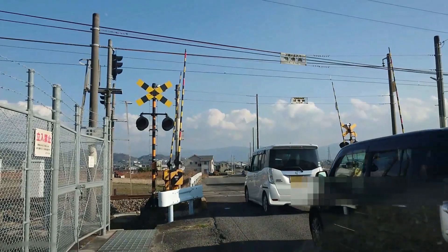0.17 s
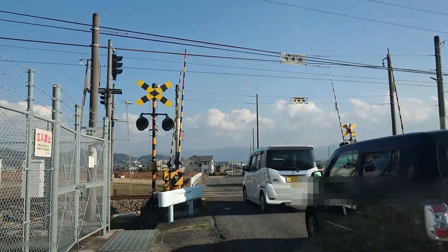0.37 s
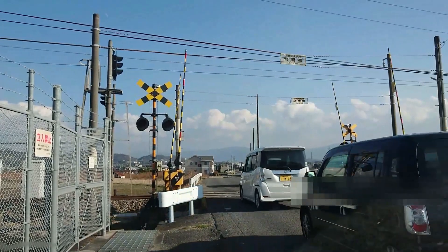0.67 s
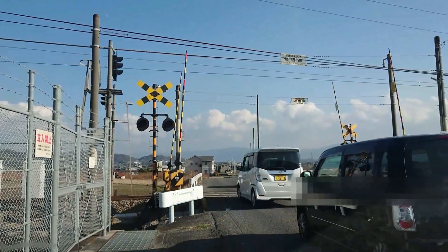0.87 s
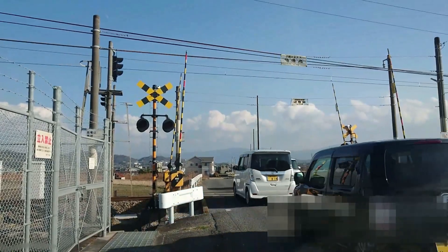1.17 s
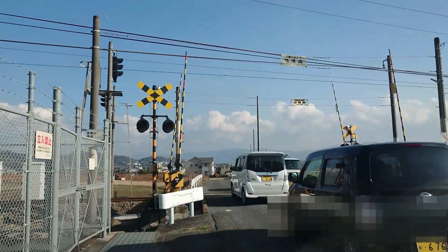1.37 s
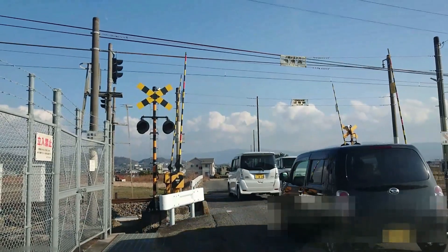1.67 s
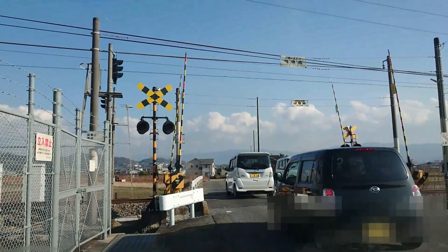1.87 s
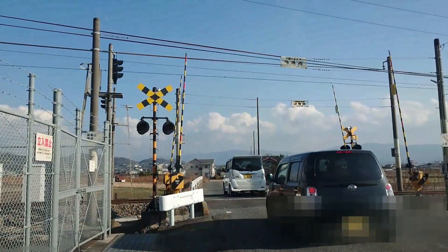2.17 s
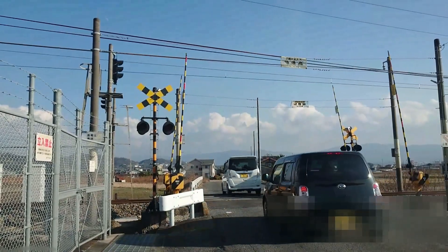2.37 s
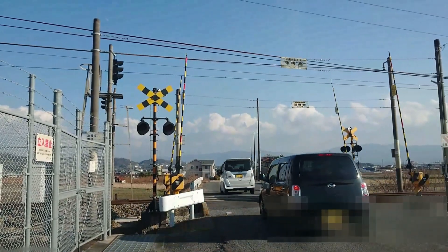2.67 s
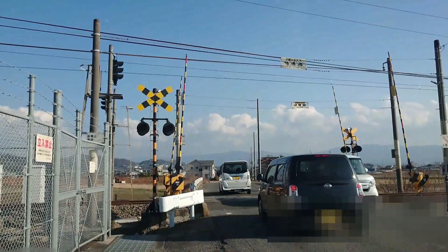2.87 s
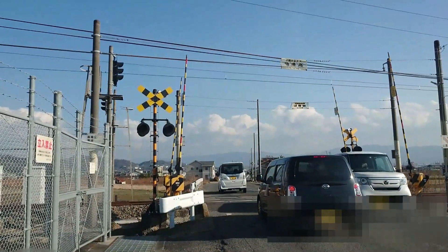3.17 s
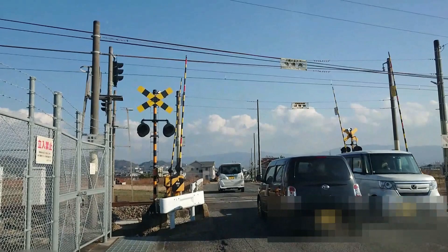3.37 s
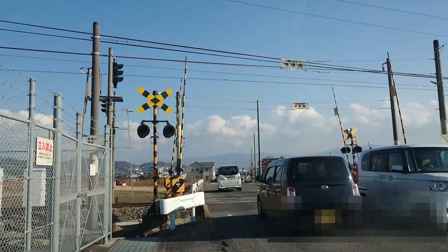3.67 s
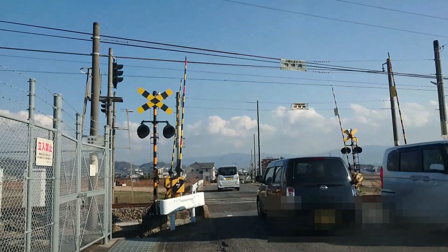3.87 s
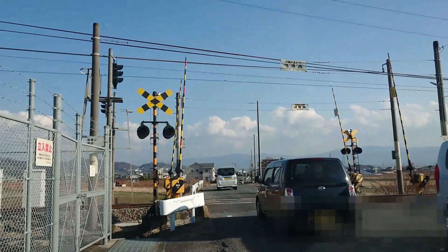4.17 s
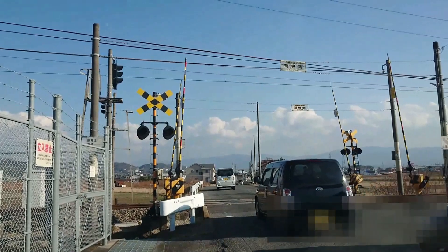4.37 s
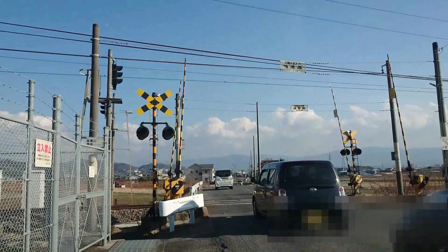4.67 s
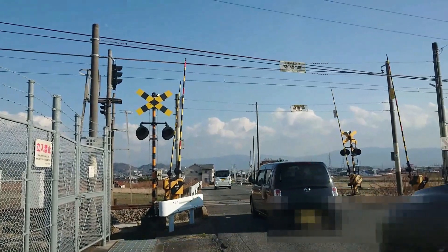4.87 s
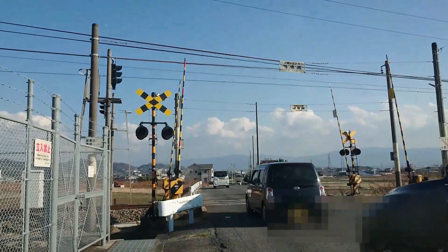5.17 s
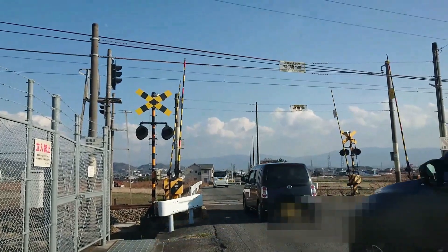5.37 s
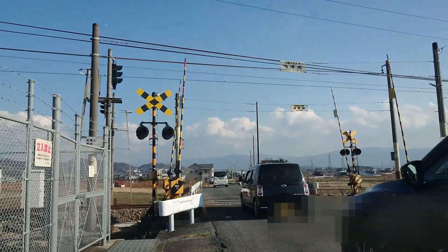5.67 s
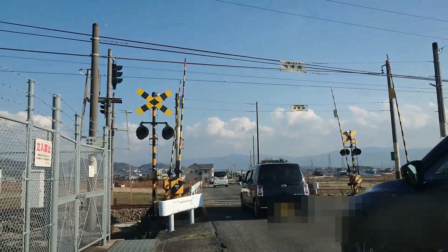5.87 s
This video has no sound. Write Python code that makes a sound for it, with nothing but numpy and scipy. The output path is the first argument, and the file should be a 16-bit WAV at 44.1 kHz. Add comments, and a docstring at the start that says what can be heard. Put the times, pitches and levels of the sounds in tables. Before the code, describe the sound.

Small cars idle and creep past close by, tyres thumping over a level crossing, with wind buffeting the microphone.

```python
"""Roadside at a level crossing: a phone's two microphones, an arm's length from a queue of three-cylinder cars.
Wind pops on the ports as the car alongside hisses and exhausts boom. About a second in a car pulls away
and a belt sings. Between two and three seconds tyres thump hardest over the rails; sand crunches under
the treads, with bright ticks here and there. Another engine climbs, more gusts hit, and just after five
seconds the next car draws alongside, its engine bay chattering, before the sound stops abruptly."""
import sys
import numpy as np
from scipy import signal
from scipy.fft import rfft, irfft, next_fast_len
from scipy.io import wavfile
from scipy.ndimage import uniform_filter1d

SR = 44100
rng = np.random.default_rng(int(sys.argv[2]) if len(sys.argv) > 2 else 0)


def dump_mix(stems):
    """Bounce the given channels to the path in sys.argv[1] as a 16-bit WAV at rate SR."""
    frames = np.atleast_2d(stems).T  # one column per channel
    limited = np.clip(frames, -1, 1)  # hard clip at full scale
    pcm = np.round(limited * 32767).astype(np.int16)
    wavfile.write(sys.argv[1], SR, pcm)


N = 265923
T = np.arange(N) / SR
ARRIVES_S, ARRIVE_TAKES_S = 5.146, 0.036  # the next car noses in beside the phone


def undb(db):
    """Decibels to gain."""
    return 10 ** (np.asarray(db) / 20)


def curves(table):
    """The columns of a table, joined by straight lines in time."""
    times, *columns = np.transpose(table)
    return [np.interp(T, times, column) for column in columns]


def unit(x):
    """Scale to rms 1."""
    return x / np.sqrt(np.mean(x ** 2))


def place(pan_db):
    """Microphone gains with a mean power of 1; pan_db is always left minus right."""
    gains = undb(np.array([[.5], [-.5]]) * pan_db)
    return gains / np.sqrt(np.mean(gains ** 2, axis=0))


def colour(x, points):
    """Filter by a (freq_hz, gain_db) outline that falls 90 dB an octave outside its ends; rms 1."""
    hz, db = np.transpose(points)
    size = next_fast_len(N)
    octave = np.log2(np.maximum(np.fft.rfftfreq(size, 1 / SR), 1))
    outside = np.abs(octave - np.clip(octave, np.log2(hz[0]), np.log2(hz[-1])))
    gain = undb(np.interp(octave, np.log2(hz), db) - 90 * outside)
    return unit(irfft(rfft(x, size) * gain, size)[..., :N])


def ring(x, hz, width_hz):
    """One resonance, gain 1 at its centre."""
    return signal.lfilter(*signal.iirpeak(min(hz, .45 * SR), hz / width_hz, fs=SR), x)


def walk(rate_hz):
    """Random drift: steps smoothed twice, spread near 1."""
    hold = int(SR / rate_hz)
    steps = np.repeat(rng.standard_normal(N // hold + 1), hold)
    return 1.3 * uniform_filter1d(uniform_filter1d(steps, hold), hold)[:N]


def cycles(hz, wobble, wobble_hz):
    """Running count of cycles at a pitch that wavers by the share `wobble`."""
    return np.cumsum(hz * (1 + wobble * walk(wobble_hz))) / SR


def air(likeness, lag_s=0.):
    """Noise at both microphones; the part they share reaches the left one lag_s later."""
    common, *own = rng.standard_normal((3, N))
    late = irfft(rfft(common) * np.exp(-2j * np.pi * np.fft.rfftfreq(N, 1 / SR) * lag_s), N)
    return np.sqrt(likeness) * np.array([late, common]) + np.sqrt(1 - likeness) * np.array(own)


def burst(peak_s, swell_s, decay_s):
    """An envelope that swells up to a moment and dies away."""
    return np.exp(np.maximum(np.minimum((T - peak_s) / swell_s, (peak_s - T) / decay_s), -30))


def handover(middle_s, takes_s):
    """Gain whose power rises smoothly from 0 to 1; a negative takes_s makes it fall."""
    return np.sqrt(.5 + .5 * np.tanh((T - middle_s) / (2 * takes_s)))


def passing(peak_s, half_width_s):
    """Gain of a car going by: a bell around its loudest moment."""
    return 1 / (1 + .5 * ((T - peak_s) / half_width_s) ** 2)


def during(table, fade_s=.05):
    """1 between the first and last moment of a curve, fading outside."""
    return np.clip(1 + np.minimum(T - table[0][0], table[-1][0] - T) / fade_s, 0, 1)


# Fans behind the queue: pitch_hz, level_db, pan_db
FAN_HUMS = [(131.3, -42, -5), (360.6, -55, 12), (593, -56.5, 11)]


def fans():
    """Fans hum in the background, easing by 5 dB between 2 and 4 s."""
    hum = 0
    for hz, db, pan_db in FAN_HUMS:
        tone = np.sqrt(2) * np.sin(2 * np.pi * cycles(hz, .002, 5.9))
        hum += tone * undb(db + walk(0.6)) * place(pan_db)
    return hum * undb(np.interp(T, [2, 4], [0, -5]))


# A drive belt, left of the phone: time_s, pitch_hz, level_db
BELT_SONG = [(1.18, 1100, -59), (1.27, 1105, -52), (1.37, 1120, -46), (1.47, 1158, -51), (1.54, 1110, -54),
             (1.61, 1097, -50), (1.72, 1090, -60)]


def belt(flutter_db=1.5):
    """A belt sings briefly and roughly as a car pulls away."""
    hz, db = curves(BELT_SONG)
    tone = np.sin(2 * np.pi * cycles(hz, .009, 200))
    return tone * undb(db + flutter_db * walk(62.7)) * during(BELT_SONG) * place(6.5)


# Sand on the road: centre_hz, relative_db
SAND_BANDS = [(1250, -3.5), (2200, -4), (4000, -8), (12000, -2)]


def sand(grains_per_s=900, queue_db=-59.5, next_car_db=-49.5, surge_db=2, patchy_db=4):
    """Treads crush sand: dense tiny cracks in uneven surges, loudest once the next car is alongside."""
    crunch = 0
    for hz, db in SAND_BANDS:
        cracks = (rng.random(N) < grains_per_s / SR) * rng.choice([-1, 1], N)
        cracks = cracks * undb(np.minimum(rng.exponential(size=N), 4))
        cracks = cracks * place(2 + 6 * rng.standard_normal(N))
        band = unit(ring(ring(cracks, hz, 0.81 * hz), hz, 0.81 * hz))
        crunch += band * undb(db + patchy_db * walk(35))
    gain = np.hypot(undb(queue_db), undb(next_car_db) * handover(ARRIVES_S, ARRIVE_TAKES_S))
    return crunch * gain * undb(surge_db * walk(24))


# Bright ticks and a swell of hiss at the phone: peak_s, level_db, centre_hz, decay_s, pan_db
TICKS_AND_HISS = [(0.1027, -28.5, 5000, 0.00053, 8), (1.226, -38, 14000, .003, 0),
                  (1.6629, -34, 4400, 0.0013, -3.5), (1.662, -39, 13500, 0.0019, -7),
                  (1.773, -26, 10000, 0.00069, 5), (1.8035, -36, 14500, 0.0014, -10),
                  (1.804, -42.5, 4600, .002, -3), (3.479, -41.5, 4560, 0.0081, -3),
                  (3.48, -44.5, 12970, 0.018, 3), (3.7878, -25.5, 2220, 0.0011, 5.5),
                  (3.79, -44, 13500, .05, 4), (3.7946, -27, 850, 0.0019, -8),
                  (3.811, -40, 12500, 0.002, 10), (3.811, -40.5, 3700, .002, -1),
                  (4.225, -36, 11000, 0.002, -2), (4.627, -39.5, 12000, 0.021, -2),
                  (4.627, -40.5, 4000, 0.022, -1.5), (4.6245, -33.5, 1900, 0.0044, -8),
                  (4.642, -46, 11500, .004, 3)]


def ticks(width_share=0.56, swell_share=0.4):
    """Short bright ticks, each in its own band, and one soft swell of high hiss near 3.8 s."""
    noise = colour(air(0.086), [(200, -9), (11000, -8.5), (14000, -7.5), (15800, -21.5)])
    bursts = 0
    for peak_s, db, hz, decay_s, pan_db in TICKS_AND_HISS:
        band = unit(ring(ring(noise, hz, width_share * hz), hz, width_share * hz))
        bursts += band * undb(db) * burst(peak_s, swell_share * decay_s, decay_s) * place(pan_db)
    return bursts


# Cars rolling past the phone: peak_s, half_width_s, tyre_relative_db, engine_rush_db, rush_pan_db
PASSING_CARS = [(1.28, 0.37, -44.5, -44.5, 2), (2.35, 0.25, -39.5, -70, -0.5), (4.1, 0.48, -46, -49, 0.5),
                (5.17, 0.17, -42, -38, 5.5)]
# Tread on asphalt, from the roadside: freq_hz, gain_db
TREAD_SPECTRUM = [(120, -30), (200, 0.5), (259, -11), (296, -8), (448, -16), (491, -13), (644, -25.5),
                  (1100, -40.5), (1430, -63), (2420, -120)]


def tyres(queue_db=-48.5, next_car_db=-37, boost_db=3.5):
    """Tread rumbles unevenly on worn asphalt, swelling with each car."""
    power = undb(queue_db) ** 2 + (undb(next_car_db) * handover(ARRIVES_S, ARRIVE_TAKES_S)) ** 2
    power += sum((undb(db) * passing(s, width)) ** 2 for s, width, db, _, _ in PASSING_CARS)
    return colour(air(0.83, 0.00039), TREAD_SPECTRUM) * np.sqrt(power) * undb(boost_db + walk(28))


# How the phone's two microphone ports differ: freq_hz, pan_db
PORT_TILT = [(60, 2.5), (110, 2), (200, -1), (380, 0), (700, 0.5), (1290, 3), (2380, 9.5), (4400, 2),
             (8120, -4), (15000, 3)]


def ports(x):
    """Each port favours its own bands; both sides come out at rms 1."""
    hz, pan_db = np.transpose(PORT_TILT)
    size = next_fast_len(N)
    gains = place(np.interp(np.fft.rfftfreq(size, 1 / SR), hz, pan_db))
    sides = irfft(rfft(x, size) * gains, size)[:, :N]
    return np.array([unit(side) for side in sides])


# Engine bays along the queue: freq_hz, gain_db
QUEUE_BAY_SPECTRUM = [(500, -8), (850, 4.5), (998, 3.5), (1130, 4), (1220, 2), (1320, 3.5), (1400, 1.5),
                      (2380, 3.5), (2790, -6), (4210, -6.5), (4900, -11), (5970, -11), (6640, -14),
                      (7200, -27), (9360, -52), (15800, -120)]
# The next car's bay, at arm's length: freq_hz, gain_db
NEAR_BAY_SPECTRUM = [(500, 1.5), (850, -10), (1070, -5.5), (1160, 3), (1230, -6.5), (1380, -0.5),
                     (1490, -7.5), (1750, 0), (1900, -12.5), (2550, -1.5), (2770, -10.5), (3280, -15.5),
                     (3620, -11.5), (5970, -18.5), (7200, -21.5), (9360, -35.5), (15800, -120)]


def bay_rush(firings, throb, leaving, arriving, queue_db=-46, leaving_db=-51.5, next_car_db=-34.5):
    """Engine bays rush and throb with the crank; the arriving one chatters with each firing."""
    power = (undb(queue_db) * place(5)) ** 2
    for peak_s, half_width_s, _, db, pan_db in PASSING_CARS:
        power = power + (undb(db) * passing(peak_s, half_width_s) * place(pan_db)) ** 2
    power += (undb(leaving_db) * leaving * place(14)) ** 2
    queue = np.sqrt(power) * ports(colour(air(0.17, 0.000343), QUEUE_BAY_SPECTRUM))
    near = undb(next_car_db) * arriving * place(5) * ports(colour(air(0.053, 0.00062), NEAR_BAY_SPECTRUM))
    chatter = 1 + 0.064 * np.cos(2 * np.pi * firings)
    return (queue * (1 + 0.11 * throb) + near * chatter) * undb(1.2 * walk(90))


# Fine hiss from the bays, left of the phone: freq_hz, gain_db
HISS_SPECTRUM = [(5000, -8), (8500, -5.5), (9530, 10), (10000, 13), (13300, 2), (15100, -6), (15800, -30)]


def bay_hiss(throb, leaving, arriving, queue_db=-52, leaving_db=-50.5, next_car_db=-44):
    """Hiss throbs with the crank in the queue and the leaving car; the next car's is even."""
    queue = undb(queue_db) * (1 + 0.89 * throb)
    staying = np.hypot(queue, undb(next_car_db) * arriving) * place(8)
    first_car = undb(leaving_db) * leaving * (1 + throb) * place(14)
    hiss = colour(air(0.23), HISS_SPECTRUM) * np.hypot(staying, first_car)
    return hiss * undb(walk(130) + .5 * walk(8.9))


def engine_bays(firings, crank_hz=21.65, throb_depth=0.23, leaves_s=1.46):
    """Rush and hiss share one crank throb as the first bay goes by and the next arrives."""
    crank = 2 * np.pi * cycles(crank_hz, .02, 1.6)
    throb = throb_depth * (np.cos(crank) + 0.38 * np.cos(2 * crank))
    leaving, arriving = handover(leaves_s, -0.042), handover(ARRIVES_S, ARRIVE_TAKES_S)
    return bay_rush(firings, throb, leaving, arriving) + bay_hiss(throb, leaving, arriving)


def overtone(firings, multiple, jitter_cycles=.01):
    """One multiple of a firing rate, roughened by firings that come a little early or late."""
    return np.sin(2 * np.pi * (multiple * (firings + jitter_cycles * walk(70)) + rng.random()))


# The next car's hum as it nears the phone: firing_multiple, relative_db
CREEP_OVERTONES = [(2, 1), (3, -8.5), (4, -13), (5, -26.5), (6, -11), (8, -22)]


def creeping_car(firing_hz=58, level_db=-29.5, swell_s=1.3):
    """An engine creeps up at a steady pitch; shielded at first, its upper overtones emerge last."""
    exposed = np.exp(np.minimum(T - ARRIVES_S, 0) / swell_s)
    firings = cycles(firing_hz, .008, 30)
    hum = sum(overtone(firings, k) * undb(db + 2 * walk(13)) * exposed ** k for k, db in CREEP_OVERTONES)
    return hum * undb(level_db)


# Engines leaving the crossing, one curve each: time_s, firing_hz, level_db, muffling_db_per_octave
PULL_AWAY_CURVES = [
    [(0.95, 43.9, -36, 6), (1.08, 45.16, -30, 5), (1.17, 46.66, -37.5, -1), (1.28, 50.07, -31.5, 4),
     (1.36, 55.94, -30, 6), (1.44, 59.5, -33.5, 0.5), (1.54, 59.98, -44, -6), (1.66, 52.7, -25, 6),
     (1.73, 49.76, -37.5, -8), (1.82, 47.4, -48, -2)],
    [(2.95, 58.1, -44, 14), (3.2, 57.53, -41.5, 11), (3.45, 58.45, -44.5, 10), (3.75, 58.56, -32, 12),
     (4.3, 57.55, -35, 10), (4.68, 60.15, -33, 4.5), (4.8, 61.1, -33.5, 7), (4.92, 64.06, -23.5, 15.5),
     (5.06, 66.9, -28, 10.5), (5.14, 68.2, -37, 17), (5.25, 64.5, -50.5, 13)],
]
# Resonances of the exhaust pipe: freq_hz, gain_db
PIPE_SPECTRUM = [(55, -4), (95, 3), (132, -14), (172, -3), (205, -1), (238, -10), (268, -17), (298, -12),
                 (350, -18), (430, -15), (520, -20), (700, -26), (900, -42)]


def pull_away(curve, muffle_from_hz=187, flutter_db=2.5):
    """Multiples of a gliding firing rate, each swelling as it crosses a pipe resonance."""
    hz, db, muffling = curves(curve)
    pipe_hz, pipe_db = np.transpose(PIPE_SPECTRUM)
    firings = cycles(hz, 0.0047, 30)
    drone = 0
    for k in range(1, 14):
        octaves_up = np.log2(np.maximum(k * hz / muffle_from_hz, 1))
        overtone_db = np.interp(k * hz, pipe_hz, pipe_db) - muffling * octaves_up
        drone += overtone(firings, k) * undb(overtone_db + flutter_db * walk(14))
    return drone * undb(db) * during(curve)


# Wind on the phone: peak_s, level_db, swell_s, decay_s, pan_db
WIND_BUFFETS = [(0.031, -8.5, 0.023, 0.073, 3.5), (.21, -21.5, .02, 0.039, -1),
                (0.31, -22, 0.044, 0.039, 8), (.43, -17.5, 0.05, 0.026, 30),
                (.59, -24.5, 0.082, 0.037, -10), (4.51, -13, 0.019, 0.012, 3.5),
                (4.61, -18.5, 0.016, 0.15, 5), (5.369, -16.5, 0.06, 0.033, -19)]
# Its rumble: freq_hz, gain_db
BUFFET_SPECTRUM = [(28, -29.5), (48, -6), (65, -4.5), (110, -20.5), (170, -31), (260, -37.5)]


def wind_gusts():
    """Longer buffets of wind rumble on the microphones."""
    gain = sum(undb(db) * burst(s, swell, decay) * place(pan) for s, db, swell, decay, pan in WIND_BUFFETS)
    return gain * colour(air(0.61), BUFFET_SPECTRUM)


# Eddies right on the microphone ports: start_s, level_db, pitch_hz, decay_s, crackle_relative_db, pan_db
PORT_POPS = [(.005, -4, 126, 0.0078, -37, -28), (0.1016, -2, 190.6, 0.0051, -20, -32),
             (0.1003, -11, 106, 0.01, -43, 1), (0.1018, -14.5, 490, 0.0041, -40, -21),
             (0.1122, -5.5, 126, 0.0095, -25, -15), (0.501, -16.5, 115, 0.04, -41, -42),
             (0.556, -7, 142, 0.0052, -43, -34), (1.7668, -0.5, 154, 0.0032, -30, -18),
             (3.401, -8, 177, 0.0037, -28, -19), (3.462, -19, 79.8, 0.12, -41, -27.5),
             (3.7868, -19.5, 300, 0.0029, -20, -12), (3.809, -12.5, 222, 0.005, -17.5, 7),
             (4.6017, -3.5, 560, 0.0008, -29, -20), (4.6222, -21, 640, 0.0029, -21, -8),
             (4.6262, -8, 831, 0.0015, -25.5, -24)]
# Their crackle: freq_hz, gain_db
CRACKLE_SPECTRUM = [(200, -4), (550, 18.5), (950, -18.5), (1600, -26), (4000, -8), (7000, -16),
                    (13000, -17.5), (16000, -41.5)]


def wind_pops(snap_db=14, snap_hz=650, snap_s=0.00049, lead_s=0.00063, crackle_s=0.0048):
    """An eddy knocks a port with a hard snap, a few damped swings and a crackle."""
    knocks, crackle = 0, 0
    for start_s, db, hz, decay_s, crackle_db, pan_db in PORT_POPS:
        age = np.maximum(T - start_s, 0)
        gain = undb(db) * place(pan_db)
        snap = undb(crackle_db + snap_db) * np.sin(2 * np.pi * snap_hz * age) * np.exp(-age / snap_s)
        after = np.maximum(age - lead_s, 0)
        swings = (1 - np.exp(-after * hz * 6)) * np.sin(2 * np.pi * hz * after) * np.exp(-after / decay_s)
        knocks += gain * (swings - snap)
        crackle += gain * undb(crackle_db + 0.5) * burst(start_s + 0.0012, 0.0006, crackle_s)
    return knocks + crackle * colour(air(0.074), CRACKLE_SPECTRUM)


# Wheels on the rails and joints: start_s, thump_relative_db, scrub_db, scrub_swell_s, scrub_decay_s, pan_db
RAIL_HITS = [(0.356, -32, -38, 0.011, 0.15, -2), (0.971, -19, -57, 0.018, .07, -1.5),
             (1.684, -24, -40.5, 0.02, 0.1, 0), (2.097, -19.5, -37, 0.054, 0.05, -0.5),
             (2.344, -16.5, -30.5, 0.04, 0.042, 2), (2.395, -12, -30, 0.0083, 0.052, 1),
             (2.606, -23.5, -42.5, 0.044, 0.2, -2), (2.832, -17, -39, 0.034, 0.03, -2),
             (2.869, -10, -31.5, 0.0054, 0.037, -0.5), (4.594, -20.5, -29.5, 0.039, 0.057, -15.5)]
# Tyre carcass and air cavity: pitch_hz, t60_s, relative_db
TYRE_RESONANCES = [(126.5, 0.15, 3), (169, 0.3, -4.5), (186.7, 0.12, 5.5), (285.4, 0.05, -2.5),
                   (368.6, 0.13, -30)]
# Tread scrubbing the crossing's deck: freq_hz, gain_db
SCRUB_SPECTRUM = [(160, -13), (280, 4), (560, -4), (801, -10.5), (893, -8.5), (1100, -19), (1300, -15.5),
                  (1410, -36), (1800, -23.5), (2340, -66), (3960, -120)]


def rail_bumps(thump_db=-6.5, contact_s=.002, body_hz=46.44, body_db=-11, rise_s=0.009, fall_s=0.12):
    """Each wheel drops on a rail: the carcass rings, the car body booms and the tread scrubs."""
    thumps, scrub = 0, 0
    for start_s, db, scrub_db, swell_s, decay_s, pan_db in RAIL_HITS:
        age = np.clip(T - start_s, 0, 1)
        carcass = 0
        for hz, t60_s, mode_db in TYRE_RESONANCES:
            detuned_hz = hz * (1 + 0.036 * rng.standard_normal())
            carcass += undb(mode_db - 60 * age / t60_s) * np.sin(2 * np.pi * detuned_hz * age)
        body = undb(body_db) * np.sin(2 * np.pi * body_hz * age) * burst(start_s + rise_s, rise_s, fall_s)
        contact = 1 - np.exp(-age / contact_s)
        thumps -= undb(db) * (carcass + body) * contact * place(pan_db)
        scrub += undb(scrub_db) * burst(start_s, swell_s, decay_s) * place(pan_db)
    return undb(thump_db) * thumps + scrub * colour(air(0.6), SCRUB_SPECTRUM) * undb(1.9 * walk(200))


def cylinder_pulses(firings, scatter_db=2):
    """One pulse a firing; three unequal cylinders put weaker lines between the overtones."""
    count = firings.astype(int)
    cylinders = 1 + np.cos(2 * np.pi * np.arange(count[-1] + 1) / 3)
    strength = cylinders * undb(scatter_db * rng.standard_normal(len(cylinders)))
    return np.diff(count, prepend=0) * strength[count]


# The nearest engine, an arm's length away: time_s, firing_hz
FIRING_RATE = [(0.15, 59.64), (0.69, 61.5), (1.15, 46.73), (1.28, 50.13), (1.47, 59.87), (1.69, 49.5),
               (2.07, 48.33), (2.32, 54.26), (2.5, 50.93), (2.89, 48.78), (4.14, 56.08), (4.78, 53.14),
               (4.87, 59.14), (5.38, 61.25)]
# Low boom of the engines together at the phone, swelling and dipping: time_s, relative_db
BOOM_LEVEL = [(0.65, -34.5), (1.2, -22), (1.29, -19.5), (1.5, -23), (1.58, -29), (1.83, -30.5), (1.98, -19),
              (2.06, -35), (2.14, -24), (2.36, -31), (2.42, -14.5), (2.48, -32), (2.52, -16.5), (2.59, -28),
              (2.65, -16), (2.8, -28.5), (2.93, -25), (3.21, -15.5), (3.35, -23.5), (4.54, -16),
              (4.61, -10.5), (4.75, -27), (4.89, -16), (5.38, -17.5)]
# Low overtones of the nearest exhaust: firing_multiple, relative_db
EXHAUST_OVERTONES = [(2, -9), (3, -3.5), (4, -8), (6, -20.5), (7, -11.5)]
# Exhaust pulses from the roadside: freq_hz, gain_db
EXHAUST_SPECTRUM = [(50, -26), (85, 3.5), (122, 2), (146, -1.5), (193, -5), (258, -24.5), (352, -24.5),
                    (450, -28.5), (492, -26.5), (641, -24.5), (700, -33), (910, -63), (1540, -120)]


def exhausts(firing_hz, firings, boom_db_per_hz_s=0.119, load_db_per_hz_s=0.0457, load_smooth_s=0.68):
    """The exhausts boom together at the nearest engine's firing rate, louder as it speeds up."""
    boom_db, = curves(BOOM_LEVEL)
    window = int(load_smooth_s * SR)
    speeding = uniform_filter1d(np.maximum(np.gradient(firing_hz) * SR, 0), int(.15 * SR))  # Hz/s
    load_db = -36 + load_db_per_hz_s * uniform_filter1d(speeding, window)
    boom_gain = undb(boom_db - 1.66 + boom_db_per_hz_s * speeding + 2 * walk(21.67))
    boom = np.sqrt(2) * np.sin(2 * np.pi * firings) * boom_gain
    pulses = undb(-4) * colour(cylinder_pulses(firings), EXHAUST_SPECTRUM)
    # a strongly pulling engine hums more cleanly
    pull = .5 + .5 * np.tanh((uniform_filter1d(boom_db, window) + 21) / 5)
    hum = 0
    for k, db in EXHAUST_OVERTONES:
        hum += np.sin(2 * np.pi * (k * firings + rng.random())) * undb(db + 2 * walk(16))
    pipe = (pulses + pull * hum) * place(-2.5)
    # the cars farther off blur into a rumble
    rumble = undb(-2 - 2 * pull) * colour(air(0.9, 0.000067), EXHAUST_SPECTRUM) * undb(2 * walk(21))
    deep_bass = colour(air(0.78), [(24, -25.5), (33, -12), (43, -34.5), (68, -4.5), (95, -25)])
    return boom * place(4) + deep_bass * undb(-21 + .5 * boom_db) + undb(load_db) * (pipe + rumble)


def scene():
    """The crossing as it reaches the phone: engines, road and wind."""
    firing_hz, = curves(FIRING_RATE)
    firings = cycles(firing_hz, 0.01217, 25)
    engines = exhausts(firing_hz, firings)
    drones = (sum(pull_away(curve) for curve in PULL_AWAY_CURVES) + creeping_car()) * place(-1)
    queue = tyres() + sand() + engine_bays(firings) + fans() + belt()
    return engines + drones + queue + rail_bumps() + wind_pops() + wind_gusts() + ticks()


def record(dry, notch_hz=7750, notch_width_hz=1100, stop_s=5.402, low_hz=22, top_hz=15800):
    """The ports swallow a narrow treble band; the sound stops abruptly; deep bass and top are cut."""
    for _ in range(2):
        dry = dry - ring(dry, notch_hz, notch_width_hz)
    dry = dry * np.exp(-np.clip((T - stop_s) / 0.0073, 0, 30))
    dry = signal.sosfilt(signal.butter(1, low_hz, "high", fs=SR, output="sos"), dry)
    return signal.sosfilt(signal.ellip(8, .2, 80, top_hz, fs=SR, output="sos"), dry)


dry = scene()
out = record(dry)
dump_mix(out)
```